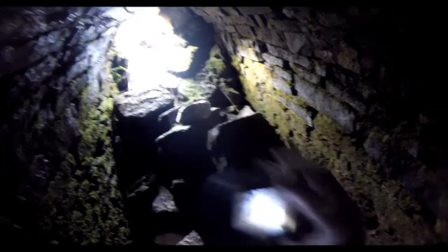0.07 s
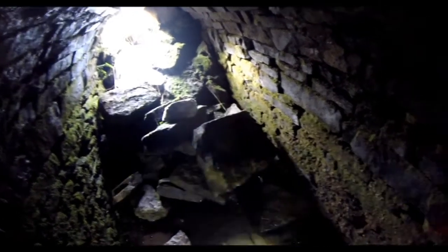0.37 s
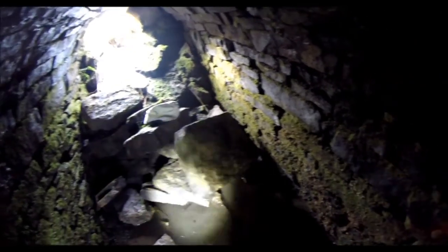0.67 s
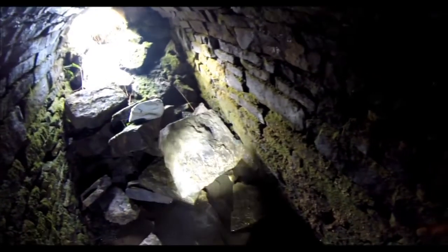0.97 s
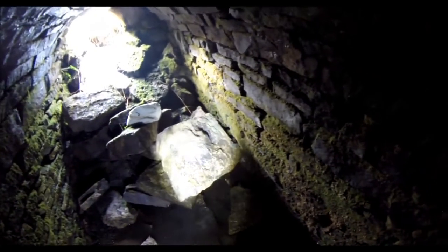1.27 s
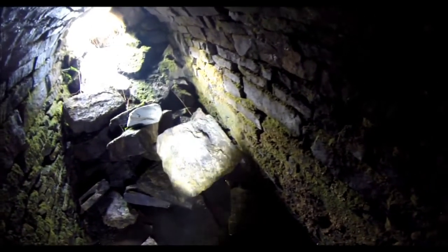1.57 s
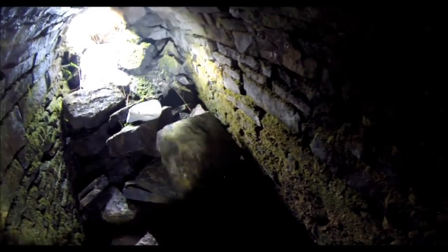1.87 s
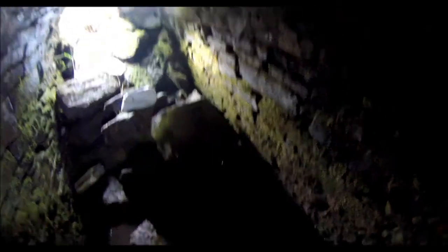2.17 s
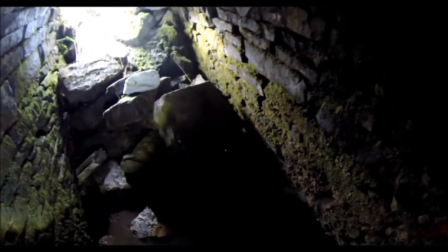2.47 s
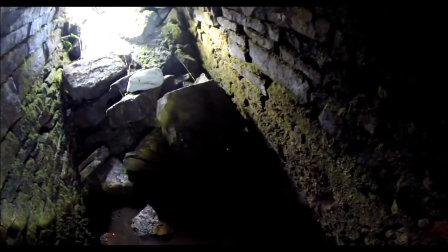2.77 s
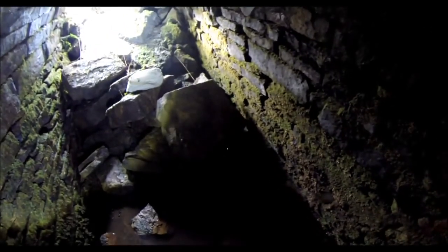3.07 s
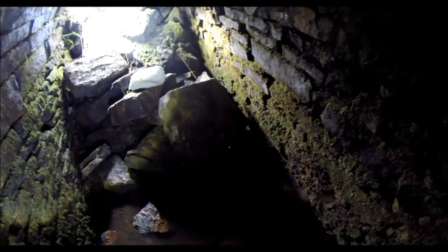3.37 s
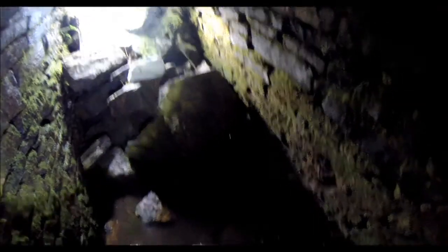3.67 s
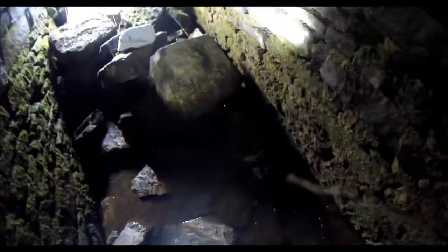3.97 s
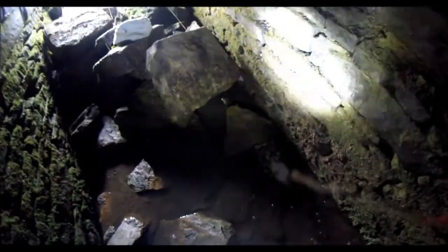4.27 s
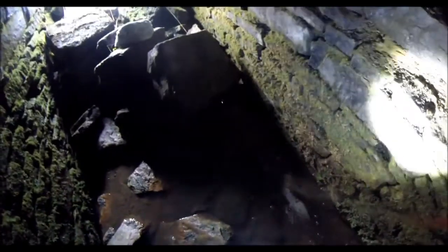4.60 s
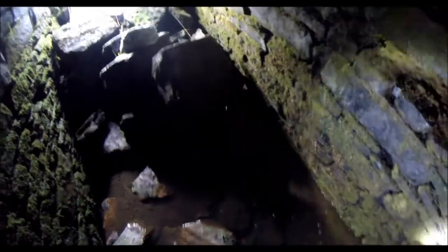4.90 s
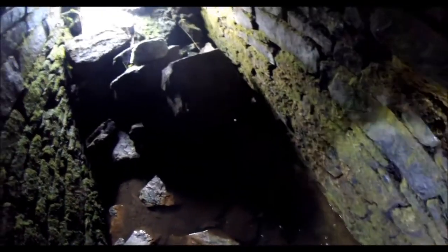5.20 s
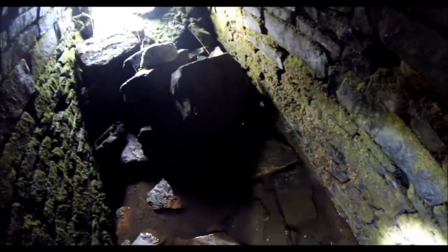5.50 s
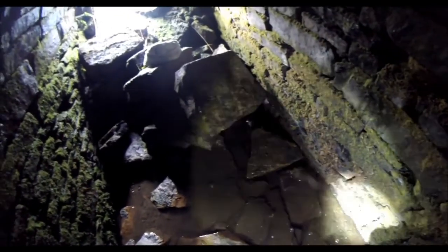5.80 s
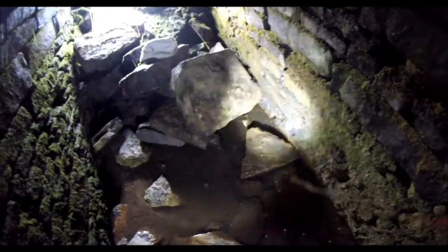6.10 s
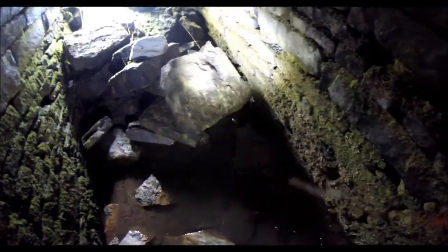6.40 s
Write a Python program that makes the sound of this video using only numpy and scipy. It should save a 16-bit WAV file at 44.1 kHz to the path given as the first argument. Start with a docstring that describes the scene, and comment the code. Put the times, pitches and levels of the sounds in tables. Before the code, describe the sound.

Faint steady hiss in a stone passage, with one low bump on the microphone, light rattles and a few sharp ticks like water drips.

```python
"""Hand-held camera in a stone passage

The air is still and damp: a faint, even hiss over a low handling rumble. One soft bump rattles the
camera's shell and leaves its mount swaying at a deep pitch; smaller rattles follow. A few dry, hollow
ticks, perhaps drips landing close by, each rebound quickly, with faint pips around them."""
import sys
import numpy as np
from scipy import signal
from scipy.fft import rfft, irfft
from scipy.io import wavfile

SR = 44100
rng = np.random.default_rng(int(sys.argv[2]) if len(sys.argv) > 2 else 0)


def dump(signal):
    """Clip the signal to [-1, 1] and save it as 16-bit WAV at the path in sys.argv[1]."""
    limited = np.clip(np.atleast_2d(signal).T, -1, 1)
    pcm = np.round(limited * 32767).astype(np.int16)
    wavfile.write(sys.argv[1], SR, pcm)


N = 284445
TIME = np.arange(N) / SR
FREQS = np.fft.rfftfreq(N, 1 / SR)


# The mount's low ring after a bump: pitch_hz, relative_db, t60_s
MOUNT_MODES = [(110, -19, 0.37), (164, -24, 0.1), (209.6, -25, 0.11), (306, -29, 0.045), (374, -50, 0.035)]
# Soft bumps on the mount: centre_s, level_db
MOUNT_BUMPS = [(1.8181, -8), (1.905, -21), (2.01, -26.5), (4.406, -42), (4.828, -33.5), (4.958, -39)]

def bumps(half_shove_s=0.003, cutoff_hz=470):
    """Each padded bump shoves the microphone out and back; the mount rings briefly, with no treble."""
    out = np.zeros(N)
    for centre_s, level_db in MOUNT_BUMPS:
        offset = (TIME - centre_s) / half_shove_s
        shove = (1 - offset ** 2) * np.exp(-offset ** 2 / 2)
        out += undb(level_db) * shove
        add(out, centre_s, -undb(level_db) * ring(MOUNT_MODES))
    padding = 1 / (1 + (FREQS / cutoff_hz) ** 8)
    return irfft(rfft(out) * padding, N)


# Deep swings as the mount settles after the big bump: start_s, pitch_hz, level_db
MOUNT_SWINGS = [(1.8733, 72.4, -16.5), (1.9007, 54.4, -14), (1.991, 68.3, -20.5)]

def sway(attack_s=0.012, t60_s=0.57):
    """The mount swings like a soft spring; each time it reseats, a new pitch takes over from the last."""
    out = np.zeros(N)
    for start_s, pitch_hz, level_db in MOUNT_SWINGS:
        t = np.maximum(TIME - start_s, 0)
        crossfade = np.sin(np.pi / 2 * np.minimum(t / attack_s, 1)) ** 2
        swing = undb(level_db - 60 * t / t60_s) * np.sin(2 * np.pi * pitch_hz * t)
        out = (1 - crossfade) * out + crossfade * swing
    return out


# The shell's short, bright ring: pitch_hz, relative_db, t60_s
SHELL_MODES = [(1370, -17, 0.022), (1625, 0.5, 0.044), (1790, -2.5, 0.034), (1990, -0.5, 0.05),
               (2114, 1, 0.024), (2192, 5, 0.027), (2450, 7.5, 0.0097), (2836, -4, 0.05),
               (3010, -11, 0.021), (3384, -7.5, 0.021), (4566, -3.5, 0.02), (5460, -4, 0.0078),
               (5730, -4.5, 0.013), (6300, -7, 0.0098)]
# Rattles of the shell: start_s, level_db, chatter_ms, tilt_db_per_octave
SHELL_RATTLES = [(1.8077, -44, 12, -3), (1.8205, -37, 4.7, -5), (1.879, -55, 12, -6),
                 (1.9965, -50.5, 12, -8), (4.5265, -42.5, 4.7, 2), (4.5327, -42.5, 16, -2.5),
                 (4.826, -53.5, 4, -12), (4.96, -49, 16, 0.5), (5.337, -56, 3.6, -6), (6.225, -61, 32, 2)]

def rattles(contacts_per_s=1900, chatter=0.99, grit_db=-10, detune=0.011):
    """A first contact and a fading burst of further ones ring the shell, with a little dry grit."""
    out = np.zeros(N)
    t = TIME[:SR // 16]
    for start_s, level_db, chatter_ms, tilt_db in SHELL_RATTLES:
        fade = np.exp(-(t / (chatter_ms / 1000)) ** 2)
        strengths = chatter * fade * rng.standard_normal(len(t))
        contacts = strengths * (rng.random(len(t)) < contacts_per_s / SR)
        contacts[0] = 1
        # a changing grip shifts the modes a little from one rattle to the next
        modes = [(hz * (1 + detune * rng.standard_normal()), db, t60) for hz, db, t60 in SHELL_MODES]
        body = signal.fftconvolve(contacts, ring(modes, tilt_db, scatter_db=1.5))[:len(t)]
        body /= body[:SR // 100].std()  # the first 10 ms set the level
        grit = undb(grit_db + 2 * tilt_db) * np.sqrt(fade) * rng.standard_normal(len(t))
        add(out, start_s, undb(level_db) * (body + grit))
    return bandpass(out, low_hz=1270, high_hz=7300, order=2)


# The hollow body of a tick: pitch_hz, relative_db, t60_s
TICK_MODES = [(790, 8.5, 0.015), (1197, 8, 0.018), (1404, 12, 0.0089), (1680, -2, 0.024), (1903, -4, 0.049),
              (2070, 7, 0.012), (2220, 12.5, 0.015), (2860, 0, 0.022)]
# Dry ticks close by: start_s, level_db, rebound_delay_ms
HOLLOW_TICKS = [(5.2435, -20.5, 7.4), (5.7725, -23, 13.7), (5.8348, -17, 8.3), (5.9452, -40.5, 7)]

def ticks(snap_db=-34, snap_decay_s=0.0016, rebound_db=-8.5):
    """A soft, very short contact rings hollow modes, with no bass and a faint snap, and rebounds once."""
    body = bandpass(ring(TICK_MODES), low_hz=976, high_hz=2290, order=4)
    snap = bandpass(rng.standard_normal(len(body)), low_hz=3500, high_hz=10000, order=2)
    snap *= np.exp(-TIME[:len(body)] / snap_decay_s)
    tick = body / abs(body).max() + undb(snap_db) * snap
    out = np.zeros(N)
    for start_s, level_db, rebound_delay_ms in HOLLOW_TICKS:
        add(out, start_s, undb(level_db) * tick)
        add(out, start_s + rebound_delay_ms / 1000, undb(level_db + rebound_db) * tick)
    return out


# Faint pips, perhaps small drops further off: start_s, pitch_hz, peak_db
FAINT_PIPS = [(4.791, 2610, -52), (4.8285, 2000, -49), (4.9610, 2640, -45.5), (5.336, 2540, -49.5),
              (6.4350, 2540, -49.5)]

def pips(rise_s=0.0016):
    """Each pip is one pitch that swells for a few cycles and dies at once."""
    out = np.zeros(N)
    t = TIME[:SR // 16]
    envelope = t / rise_s * np.exp(1 - t / rise_s)
    for start_s, pitch_hz, peak_db in FAINT_PIPS:
        add(out, start_s, undb(peak_db) * envelope * np.sin(2 * np.pi * pitch_hz * t))
    return out


# Moves of the hand holding the camera: centre_s, half_length_s, rumble_db, shake_db
HAND_MOVES = [(0.244, 0.21, -42, -79), (3.84, .17, -42, -51), (4.85, .6, -53, -62.5), (5.88, .06, -47, -64)]

def handling(held_rumble_db=-56, held_shake_db=-70):
    """The hand keeps up a deep rumble and shakes the mount's resonances; each move swells both."""
    rumble_power, shake_power = undb(held_rumble_db) ** 2, undb(held_shake_db) ** 2
    for centre_s, half_length_s, rumble_db, shake_db in HAND_MOVES:
        swell = np.exp(-((TIME - centre_s) / half_length_s) ** 2)
        rumble_power += swell * undb(rumble_db) ** 2
        shake_power += swell * undb(shake_db) ** 2
    rumble = noise(resonance(hz=12.5, width_hz=22.6))
    shake = noise(resonance(hz=65.7, width_hz=14.5) + undb(-14) * resonance(hz=113, width_hz=30))
    return rumble * np.sqrt(rumble_power) + shake * np.sqrt(shake_power)


# Tone curve of the still air and microphone hiss: frequency_hz, relative_db
HISS_CURVE = [(10, 3), (30, 10), (50, -5.5), (70, 3.5), (95, -3), (165, -4), (330, -7), (670, -11.5),
              (1100, -14.5), (1800, -16.5), (3500, -21.5), (6000, -27), (8000, -30)]
# Tone curve of the fainter sizzle on top: frequency_hz, relative_db
SIZZLE_CURVE = [(4820, -30), (8200, -11), (8540, -4.5), (15500, -15.5)]
# Thin whistling bands in the hiss: pitch_hz, width_hz, rms_db
WHISTLE_BANDS = [(6880, 110, -88), (7490, 100, -83), (7990, 110, -87)]

def hiss(step_hz=8150):
    """A steady bed of air and microphone hiss, with thin whistles just under a step down in the treble."""
    air = noise(colour(HISS_CURVE) * (FREQS < step_hz), rms_db=-58, low_hz=200, high_hz=7000)
    sizzle = noise(colour(SIZZLE_CURVE) * (FREQS >= step_hz), rms_db=-77)
    whistles = sum(noise(resonance(hz, width_hz), rms_db) for hz, width_hz, rms_db in WHISTLE_BANDS)
    return air + sizzle + whistles


def ring(modes, tilt_db=0, scatter_db=0):
    """A struck body's decaying modes, tilted about 2 kHz; where the blow lands scatters their levels."""
    t = TIME[:SR // 4]
    pitch_hz, level_db, t60_s = np.transpose(modes)[:, :, None]
    octaves = np.log2(pitch_hz / 2000)
    level_db = level_db + tilt_db * octaves + scatter_db * rng.standard_normal(pitch_hz.shape)
    return np.sum(undb(level_db - 60 * t / t60_s) * np.sin(2 * np.pi * pitch_hz * t), axis=0)


def noise(gain, rms_db=0, low_hz=0, high_hz=SR):
    """Noise shaped by a gain per frequency; the part between low_hz and high_hz sits at rms_db."""
    spectrum = rfft(rng.standard_normal(N)) * gain
    band = irfft(spectrum * ((FREQS >= low_hz) & (FREQS <= high_hz)), N)
    return irfft(spectrum, N) * undb(rms_db) / band.std()


def colour(curve):
    """Gain per frequency along a tone curve."""
    hz, db = np.transpose(curve)
    return undb(np.interp(np.log(FREQS + 1), np.log(hz), db))


def resonance(hz, width_hz):
    """Gain per frequency of one resonant peak."""
    return 1 / (1 + (2 * (FREQS - hz) / width_hz) ** 2)


def bandpass(sound, low_hz, high_hz, order):
    """Keep one band of a sound."""
    return signal.sosfilt(signal.butter(order, [low_hz, high_hz], "bandpass", fs=SR, output="sos"), sound)


def undb(db):
    """Decibels to gain."""
    return 10 ** (np.asarray(db) / 20)


def add(track, start_s, sound):
    """Mix a sound into the track at its cue."""
    first = int(start_s * SR)
    track[first:first + len(sound)] += sound[:N - first]


def scene():
    """A mono mix; everything is close to the microphone or faint, so it sounds dry."""
    bed = hiss() + handling()
    return (bumps() + sway() + rattles() + ticks() + pips() + bed)[None]


def record(dry):
    """The recorder cuts the top steeply above 15.5 kHz."""
    return signal.sosfilt(signal.ellip(10, rp=0.1, rs=80, Wn=15500, fs=SR, output="sos"), dry)


dry = scene()
out = record(dry)
dump(out)
```